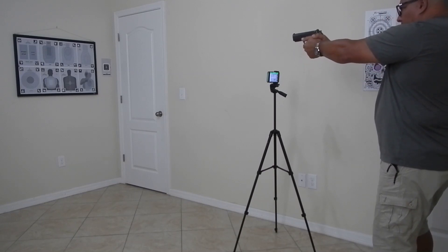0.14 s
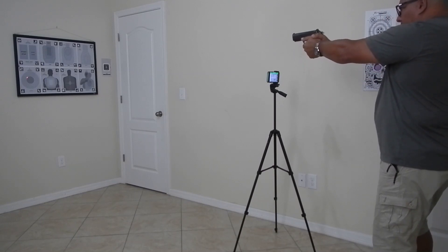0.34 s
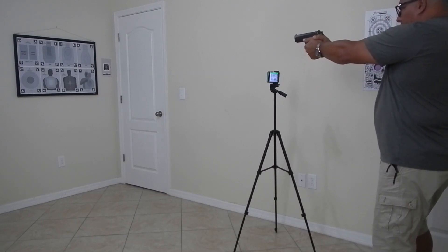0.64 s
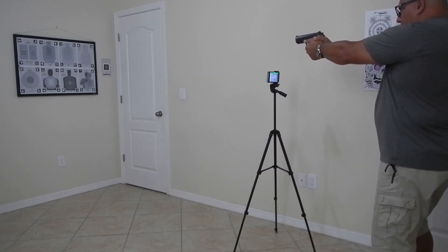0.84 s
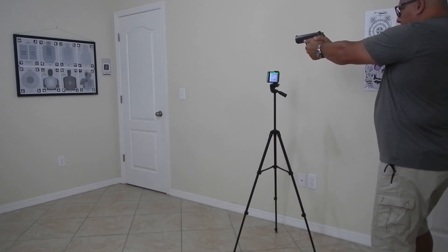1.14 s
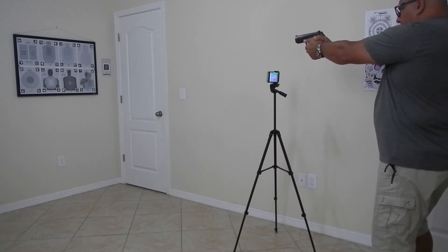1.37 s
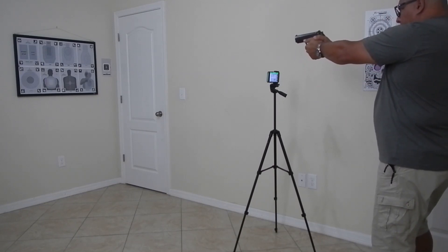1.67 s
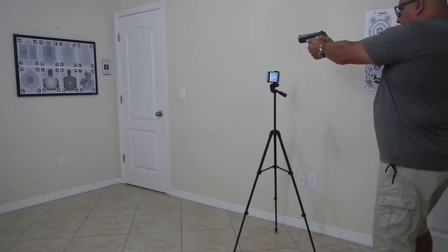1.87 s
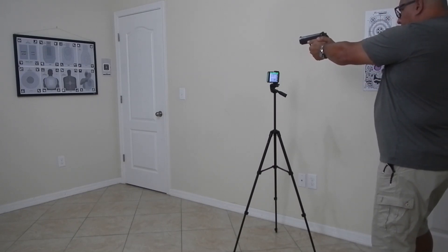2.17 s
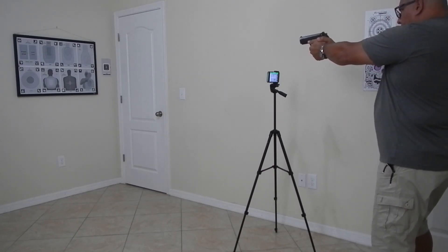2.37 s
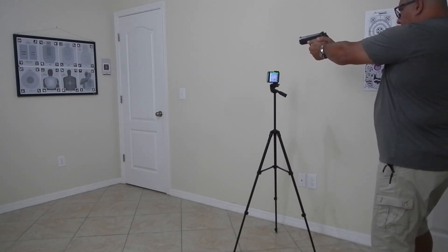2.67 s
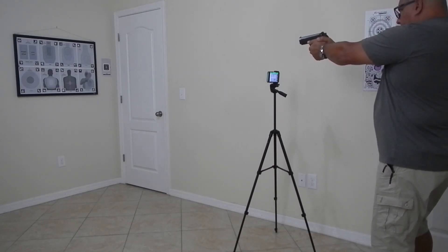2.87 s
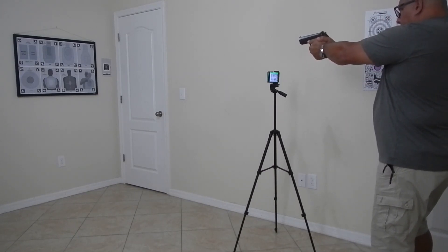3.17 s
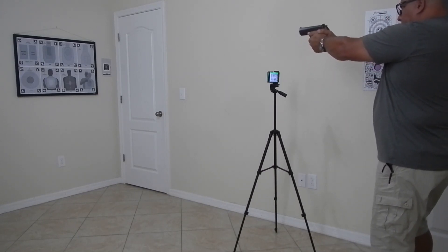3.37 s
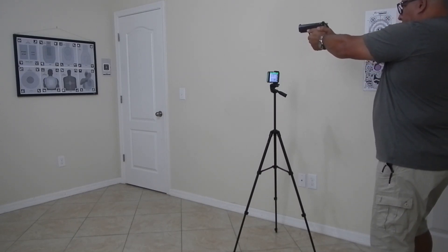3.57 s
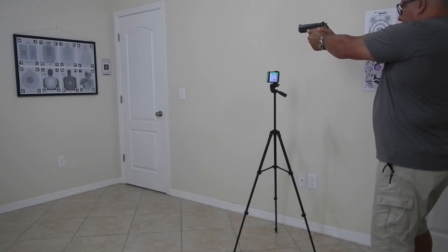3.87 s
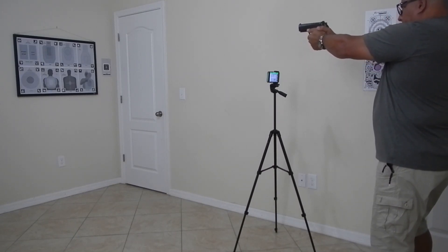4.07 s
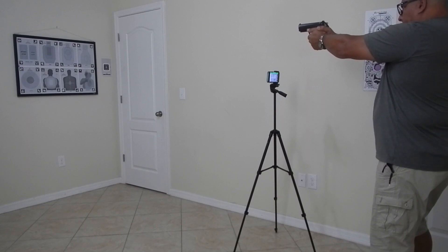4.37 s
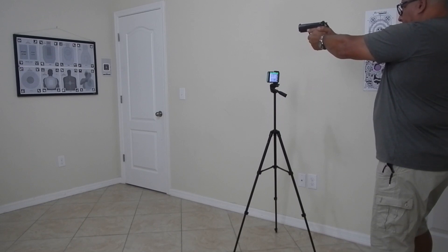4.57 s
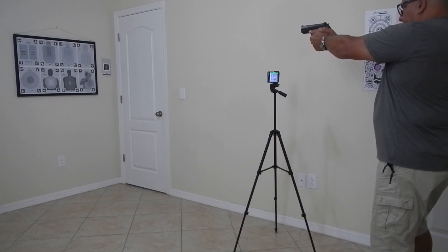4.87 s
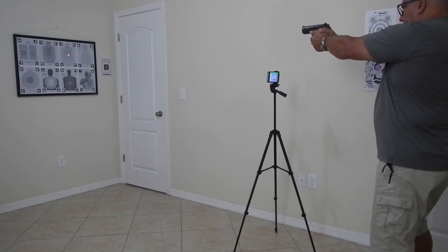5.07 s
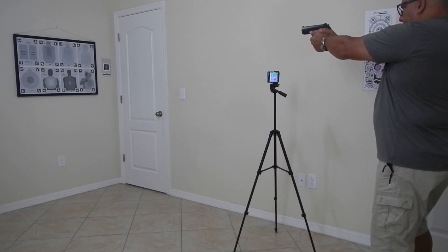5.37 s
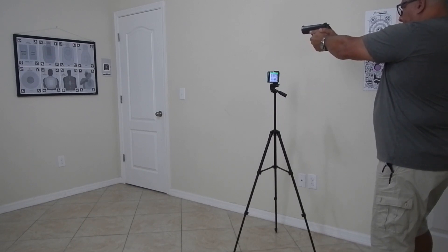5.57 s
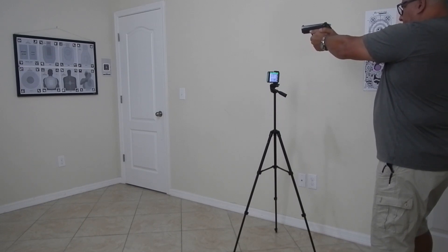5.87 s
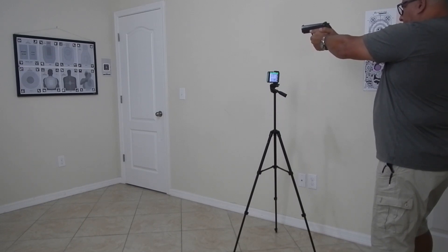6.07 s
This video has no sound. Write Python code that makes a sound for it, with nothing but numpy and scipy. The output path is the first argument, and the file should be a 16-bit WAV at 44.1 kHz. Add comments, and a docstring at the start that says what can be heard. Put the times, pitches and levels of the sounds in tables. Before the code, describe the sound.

Sharp hammer clicks snap out about every half second, ringing through a hard empty room, with faint trigger ticks between them over soft ventilation.

```python
"""Hard steel cracks ring out first: a pistol is dry-fired fourteen times in a bare, tiled room.
At each shot the sear scrapes, then the hammer strikes, bounces once, and rings modelled steel resonances.
Soft trigger ticks fall between the shots. Early echoes and a long noise tail make the room,
over faint ventilation (shaped noise) and mains hum (a sine).
The camera's gain control ducks at each blow, holds and climbs back, which draws out the tails."""
import sys
import numpy as np
from scipy import signal
from scipy.fft import rfft, irfft, next_fast_len
from scipy.io import wavfile
from scipy.ndimage import uniform_filter1d, minimum_filter1d, map_coordinates

SR = 44100
rng = np.random.default_rng(int(sys.argv[2]) if len(sys.argv) > 2 else 0)


def waveform_to_disk(signal):
    """Save audio, clipped to [-1, 1], as 16-bit WAV at the path in sys.argv[1]."""
    frames = np.transpose(np.atleast_2d(signal))
    scaled = np.clip(frames, -1, 1) * 32767
    samples = np.round(scaled).astype(np.int16)
    wavfile.write(sys.argv[1], SR, samples)


N = 274743

# All table levels are relative: later mix gains and the gain control still act on them.
# Hammer blows: start_s, level_db, hand_jolt_db, grip_knock_db, room_wash_db (over the crack)
HAMMER_BLOWS = [(0.0143, 8.5, -48, -36.5, 9.5), (0.3687, 10.5, -47, -37.5, 8.5),
                (0.8275, 8.5, -50, -35, 10), (1.2312, 9.5, -44, -36, 8), (1.5901, 6.5, -44.5, -36, 11),
                (2.1105, 7, -44, -36, 12), (2.601, 10, -48, -34.5, 9.5), (3.0163, 6.5, -65, -36, 9.5),
                (3.712, 7.5, -47, -36.5, 11), (4.0778, 6, -53, -35, 10), (4.4938, 11, -51, -37, 7),
                (5.081, 9, -45.5, -36, 9.5), (5.4754, 8.5, -52, -36, 9), (5.9562, 9, -49, -30, 9)]
# Resonances of the slide and frame: pitch_hz, width_hz, level_db
SLIDE_MODES = [(1197, 23, -5.5), (1520, 70, -3.5), (1977, 104, 4.5), (2504, 135, 2), (2750, 88, 1),
               (6320, 250, 2), (6670, 170, 9), (6735, 70, 13.5), (9260, 280, 4), (9580, 90, 9.5),
               (9720, 105, 11), (10740, 230, 7.5)]
# Resonances of the firing pin and hammer: pitch_hz, width_hz, level_db
PIN_MODES = [(12500, 280, 8.5), (12560, 170, 7), (13145, 55, 18.5), (14000, 150, -17), (14700, 110, -8)]
# Knock of the hollow grip: pitch_hz, width_hz, level_db
GRIP_MODES = [(650, 870, 21.5)]
# Crack of steel on steel: frequency_hz, level_db (per Hz)
CRACK_SPECTRUM = [(100, -29.5), (500, -14), (1100, -12.5), (1700, -1), (2800, -2), (4000, -3.5),
                  (4900, -4.5), (6500, 2.5), (8200, -3.5), (9700, 5.5), (11000, 4.5), (11700, -6),
                  (13000, 3), (16000, -10)]
# Jolt of the hands: frequency_hz, level_db (per Hz)
JOLT_SPECTRUM = [(25, 32.5), (150, 30), (300, 31.5), (700, 10), (4000, -3)]
# Scrape of the sear: frequency_hz, level_db (per Hz)
SEAR_SPECTRUM = [(400, -22.5), (1700, -5), (7000, -6), (14000, -11)]
SEAR_LEAD_S, SEAR_DB = .0052, -15.5  # the sear slips just before the blow, and far softer
BOUNCE_S, BOUNCE_DB = .0025, -7.5  # the hammer's one rebound: typical delay, level
SLIDE_DB, PIN_DB = -2.3, -0.9  # how strongly every blow rings the steel parts


def steel_power(hz):
    """Power response of the struck steel: a broad crack plus the ringing slide and pin."""
    crack = amp(along(CRACK_SPECTRUM, hz)) ** 2
    slide = amp(SLIDE_DB) ** 2 * resonances(SLIDE_MODES, hz)
    pin = amp(PIN_DB) ** 2 * resonances(PIN_MODES, hz)
    return crack + slide + pin


def hold_colour(hz, depth_db=1.85, spacing_hz=110):
    """The hands damp the gun a little differently at each shot: a random power ripple over frequency."""
    knots = rng.standard_normal(1000)
    ripple = map_coordinates(knots, [hz / spacing_hz], mode="mirror")
    return amp(depth_db * ripple) ** 2


def hammer():
    """The sear scrapes free; a moment later the hammer cracks onto the slide, bounces once and jolts the grip."""
    out = np.zeros((2, N))
    scrape = ring(lambda hz: amp(along(SEAR_SPECTRUM, hz)) ** 2)
    for start_s, level_db, jolt_db, grip_db, wash_db in HAMMER_BLOWS:
        def gun_power(hz):
            jolt = amp(jolt_db + along(JOLT_SPECTRUM, hz)) ** 2
            knock = amp(grip_db) ** 2 * resonances(GRIP_MODES, hz)
            return (steel_power(hz) + jolt + knock) * hold_colour(hz)

        gun = ring(gun_power)
        contacts = burst(t60=0.02)
        bounce_s = BOUNCE_S * rng.uniform(.7, 1.3)
        add(contacts, bounce_s, amp(BOUNCE_DB) * burst(t60=0.018))
        add(out, start_s, amp(level_db) * room(contacts, gun, wash_db))
        sear = signal.fftconvolve(scrape[None], cluster(t60=0.073), axes=1)
        add(out, start_s - SEAR_LEAD_S, amp(level_db + SEAR_DB) * sear)
    return out


# Trigger ticks, as it resets or takes up its slack: start_s, level_db
TRIGGER_TICKS = [(0.786, -20), (1.1738, -19), (1.4165, -17), (2.0589, -18.5), (2.439, -19.5),
                 (2.9476, -21.5), (3.6321, -17.5), (4.0198, -22), (4.4291, -22.5), (4.952, -23.5),
                 (5.7595, -19.5), (5.877, -23)]
# Colour of a trigger tick: frequency_hz, level_db (per Hz)
TICK_SPECTRUM = [(300, -20), (1000, -10.5), (2000, 1), (4500, -7.5), (6700, 2), (8200, -3), (10300, 2.5),
                 (12000, -11), (16000, -20)]


def trigger(tail_db=9.5, seat_s=.0045, seat_db=-2):
    """The trigger resets or takes up its slack: a lighter, duller tick, and a second as the bar seats."""
    out = np.zeros((2, N))
    tick = ring(lambda hz: amp(along(TICK_SPECTRUM, hz)) ** 2)
    for start_s, level_db in TRIGGER_TICKS:
        contacts = burst(t60=0.0054)
        add(contacts, seat_s, amp(seat_db) * burst(t60=.005))
        add(out, start_s, amp(level_db) * room(contacts, tick, tail_db))
    return out


def burst(t60, count=6):
    """A dying flurry of contacts or echoes, of energy 1, about equally strong at all frequencies."""
    t = np.arange(SR // 8) / SR
    x = rng.standard_normal(len(t)) * fade(t, t60)
    for _ in range(count):
        # keep only the phase, which flattens the spectrum, then tidy the decay again
        flat = irfft(np.exp(1j * np.angle(rfft(x))), len(t))
        x = flat * fade(t, 10 * t60)
    return x / np.linalg.norm(x)


def resonances(modes, hz):
    """Power response of a set of damped modes."""
    total = 0
    for centre, width, db in modes:
        detuning = (hz ** 2 - centre ** 2) / (width * hz + 1)
        total = total + amp(db) ** 2 / (1 + detuning ** 2)
    return total


def ring(power):
    """How a body with this power response rings after one sharp tap (minimum phase); energy 1."""
    size = 2 * (SR // 20)
    log_gain = np.log(power(np.fft.rfftfreq(size, 1 / SR)) + 1e-12) / 2
    cepstrum = irfft(log_gain)
    # folding the cepstrum to positive time puts the energy as early as it can be
    x = irfft(np.exp(rfft(2 * cepstrum[:size // 2], size)))
    return x / np.linalg.norm(x)


def room(contacts, body, tail_db):
    """Contacts ring a body; the first arrivals keep their pattern, the tail only the body's colour."""
    answer = amp(tail_db) * tail()
    add(answer, 0, signal.fftconvolve(contacts[None], early(), axes=1))
    return signal.fftconvolve(body[None], answer, axes=1)


def early(near_db=3, ceiling_db=0, wall_db=-1):
    """Direct sound, the near wall and ceiling, and a slap from the far wall."""
    answer = np.zeros((2, SR // 8))
    answer[:, 0] = 1
    add(answer, .0005, amp(near_db) * cluster(t60=0.026))
    # the gun beams its treble at the surfaces ahead and above
    bright = lambda hz: amp(along([(200, -16), (2500, -2), (7000, -1)], hz))
    add(answer, .0075, amp(ceiling_db) * filtered(cluster(t60=.015), bright))
    add(answer, .0283, amp(wall_db) * filtered(cluster(t60=0.023), bright))
    return answer


# Decay time of the tiled room: frequency_hz, t60_s
ROOM_DECAY = [(150, 1.1), (800, 1.177), (2000, 1.103), (4000, 0.96), (7000, 0.77), (10000, 0.71),
              (13000, 0.51), (16000, 0.42)]
# Colour of the room's wash: frequency_hz, level_db
WASH_COLOUR = [(100, -8), (500, -6), (1000, 0), (1700, -1.5), (4000, 2), (7000, 1), (11000, -2),
               (16000, -2)]


def tail(build_s=0.017):
    """The long wash of the tiled room, of energy 1 on the left; its treble dies first."""
    noise = diffuse(rng.standard_normal((2, SR * 5 // 4)))
    hz, t, z = signal.stft(noise, SR, nperseg=256)
    colour = amp(along(WASH_COLOUR, hz))[:, None]
    decay = fade(t, along(ROOM_DECAY, hz)[:, None])
    build = 1 - np.exp(-t / build_s)
    wash = signal.istft(z * colour * decay * build, SR, nperseg=256)[1]
    return wash / np.linalg.norm(wash[0])


def cluster(t60):
    """A tight bunch of reflections."""
    return diffuse(np.array([burst(t60), burst(t60)]))


# Likeness of the two microphones in diffuse sound: frequency_hz, correlation (-1 to 1, no unit)
STEREO_LIKENESS = [(60, -0.25), (300, 0.39), (1300, 0.81), (2400, 0.83), (4500, 0.31), (6700, 0.28),
                   (8500, -0.32), (13000, 0.067)]


def diffuse(pair):
    """Two unrelated signals, heard as sound from all sides at two close microphones."""
    def mid_side_gains(hz):
        turn = np.arccos(np.clip(along(STEREO_LIKENESS, hz), -1, 1)) / 2
        return np.array([np.cos(turn), np.sin(turn)])

    mid, side = filtered(pair, mid_side_gains)
    return np.array([mid + side, mid - side])


# Ventilation noise: frequency_hz, level_db (per Hz)
AIR_SPECTRUM = [(25, -8), (60, -1), (150, -4), (400, -7), (1000, -13), (2000, -2), (5000, -8.5),
                (10000, -15.5), (16000, -29)]


def background(hum_hz=119.5, air_db=-54, hum_db=-69.5):
    """Soft ventilation as shaped diffuse noise, and a mains hum as one sine."""
    noise = diffuse(rng.standard_normal((2, N)))
    air = filtered(noise, lambda hz: amp(along(AIR_SPECTRUM, hz)))
    hum = np.sin(2 * np.pi * hum_hz * np.arange(N) / SR)
    return amp(air_db) * air / np.std(air) + amp(hum_db) * hum


def gain_control(x, threshold_db, hold_s, recovery_db):
    """A level over the threshold pulls the gain down at once; after the hold it climbs back in dB a second."""
    power = np.abs(uniform_filter1d(np.mean(x ** 2, axis=0), size=SR // 400))
    needed_db = np.minimum(threshold_db - 10 * np.log10(power + 1e-12), 0)
    half = int(hold_s * SR / 2)
    # the shifted window looks back only, so each dip is held
    held_db = minimum_filter1d(needed_db, 2 * half + 1, origin=half, mode="constant")
    climb_db = recovery_db * np.arange(N) / SR
    gain_db = np.minimum.accumulate(held_db - climb_db) + climb_db
    return x * amp(uniform_filter1d(gain_db, size=SR // 1000))


def amp(db):
    """Decibels to gain."""
    return 10 ** (np.asarray(db) / 20)


def along(points, hz):
    """(frequency_hz, value) points read on a log frequency axis."""
    f, v = np.transpose(points)
    return np.interp(np.log(hz + 1), np.log(f + 1), v)


def fade(t, t60):
    """Exponential decay by 60 dB in t60 seconds."""
    return np.exp(-np.log(1000) * t / t60)


def filtered(x, response):
    """Filter x by a gain that depends on frequency."""
    n = x.shape[-1]
    padded = next_fast_len(n + SR // 10)
    spectrum = rfft(x, padded) * response(np.fft.rfftfreq(padded, 1 / SR))
    return irfft(spectrum, padded)[..., :n]


def add(track, s, sound):
    """Mix a sound into the track at s seconds."""
    start = max(round(s * SR), 0)
    part = sound[..., :max(track.shape[-1] - start, 0)]
    track[..., start:start + part.shape[-1]] += part


def scene():
    """The pistol in its room."""
    return hammer() + trigger() + background()


# Tilt between the microphones, the left one's gain and the right one's loss: frequency_hz, level_db
MIC_LEAN = [(100, -0.5), (500, -0.3), (2000, 0), (5000, 0), (9000, 0.3), (13000, -1)]
TOP_HZ = 15900  # nothing passes above this


def record(dry):
    """The camera's two microphones, gain control and band limit."""
    heard = filtered(dry, lambda hz: amp(np.outer([1, -1], along(MIC_LEAN, hz))))
    levelled = gain_control(heard, threshold_db=-19.5, hold_s=0.13, recovery_db=34.0)
    return filtered(amp(2) * levelled, lambda hz: hz < TOP_HZ)


dry = scene()
out = record(dry)
waveform_to_disk(out)
```